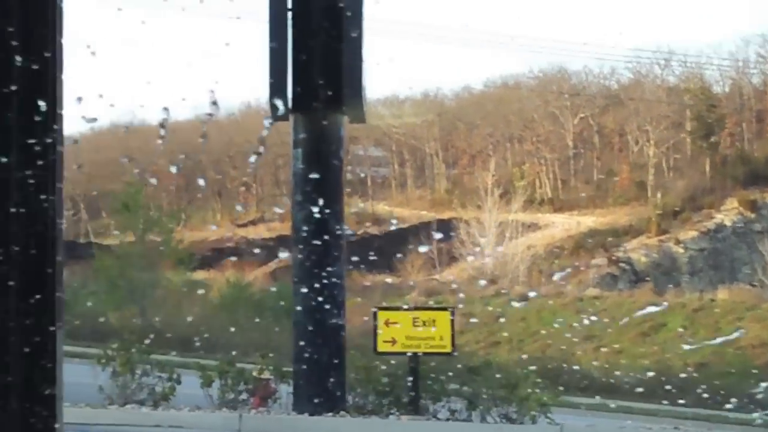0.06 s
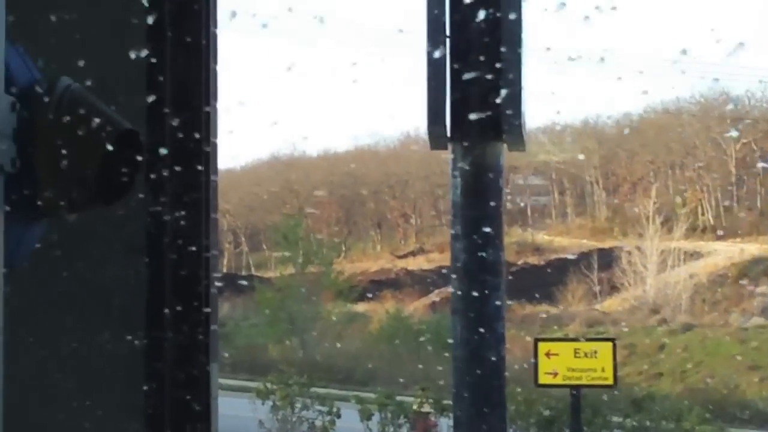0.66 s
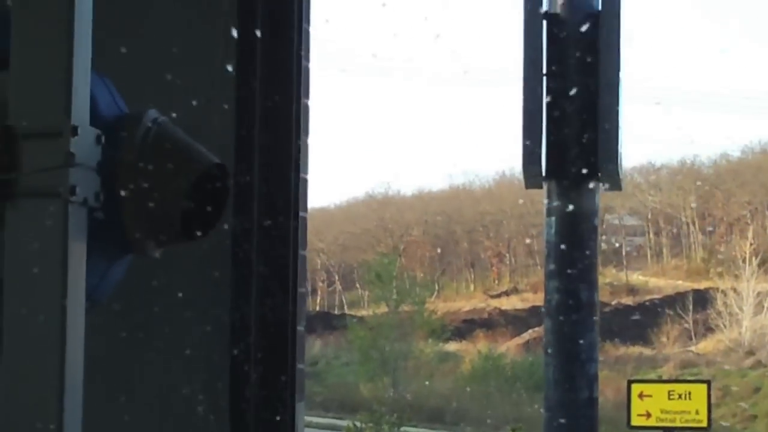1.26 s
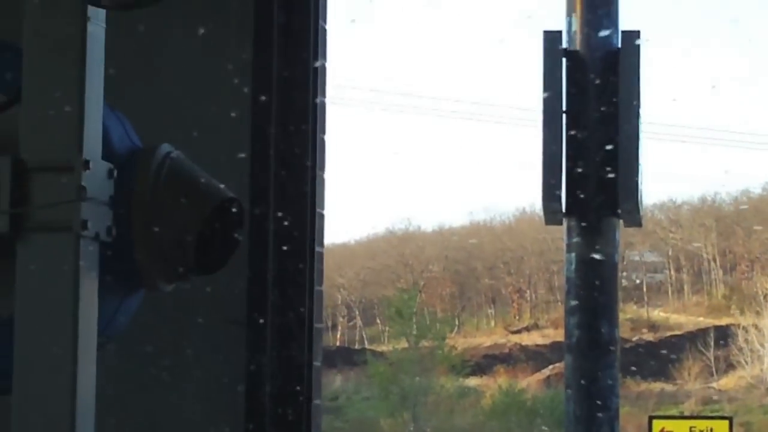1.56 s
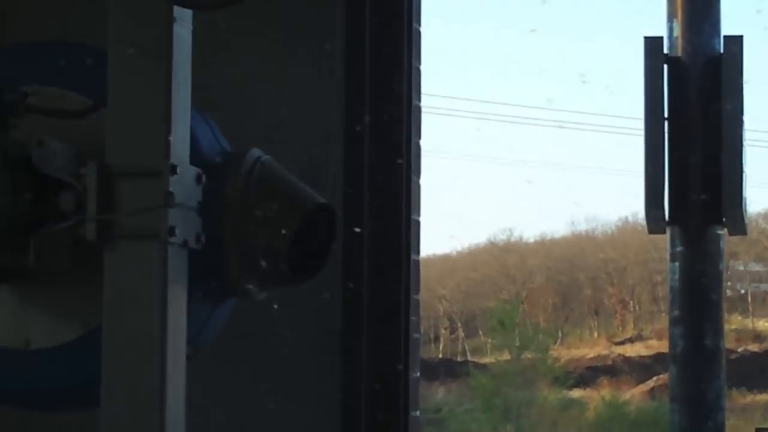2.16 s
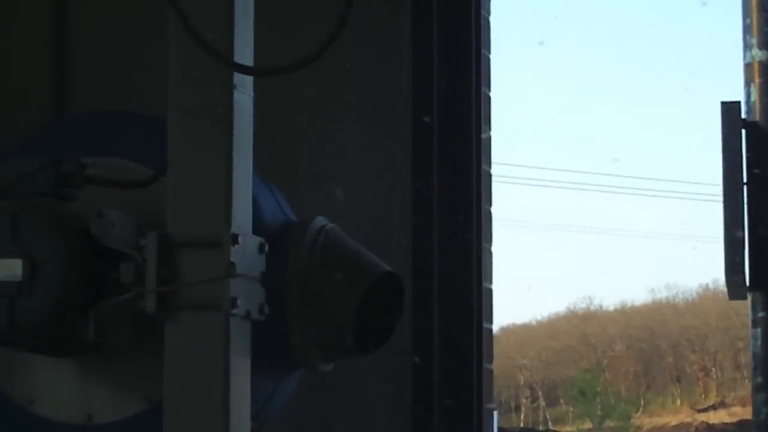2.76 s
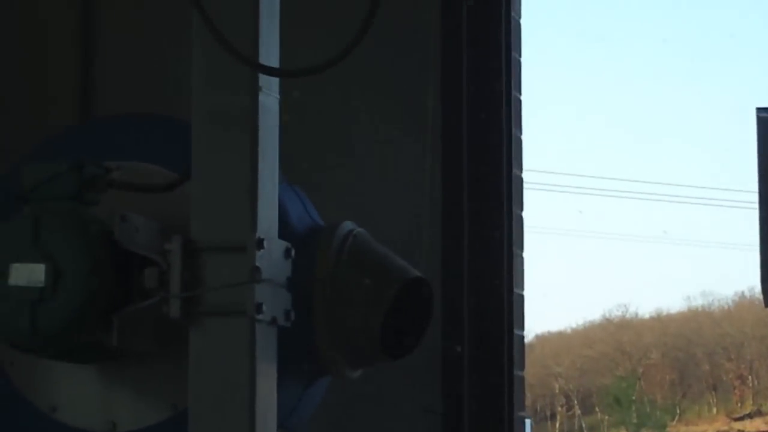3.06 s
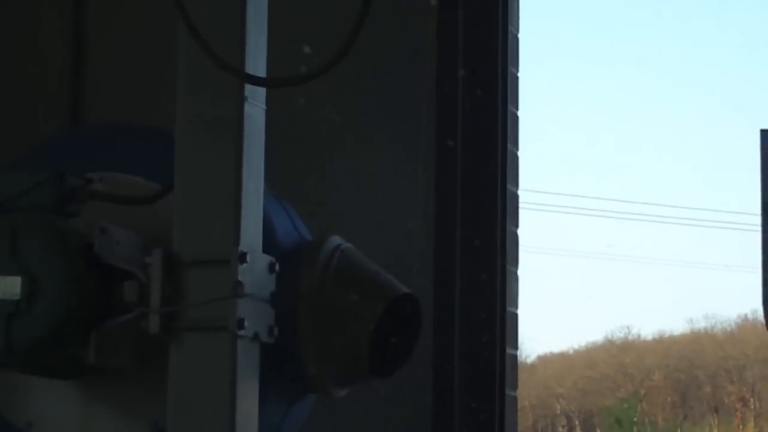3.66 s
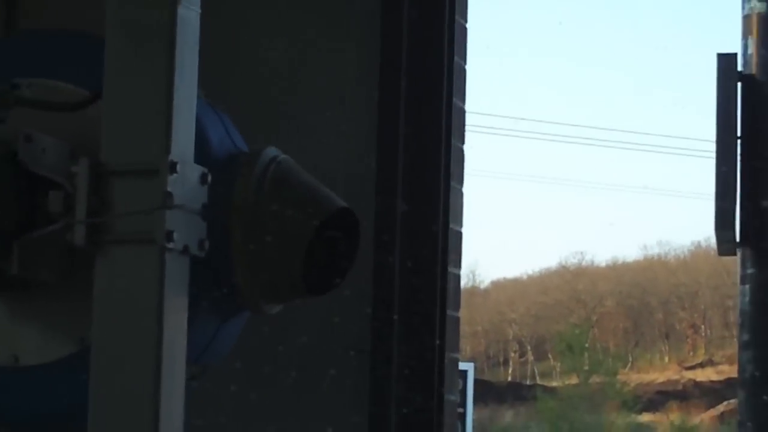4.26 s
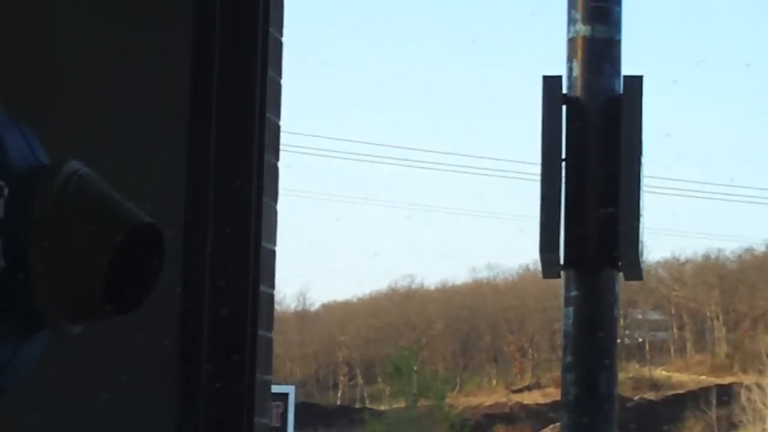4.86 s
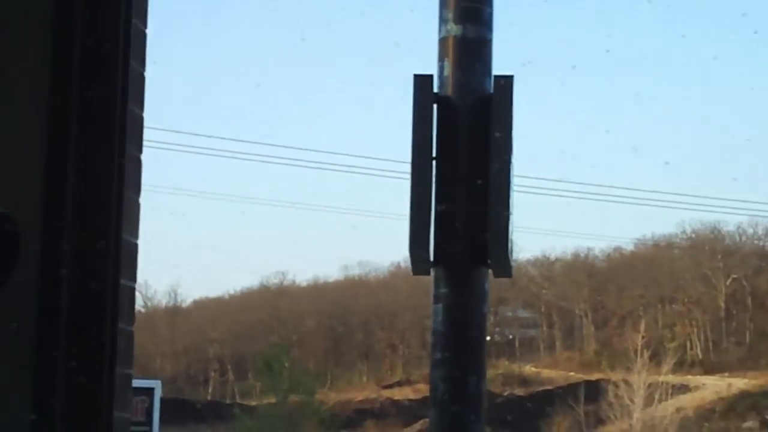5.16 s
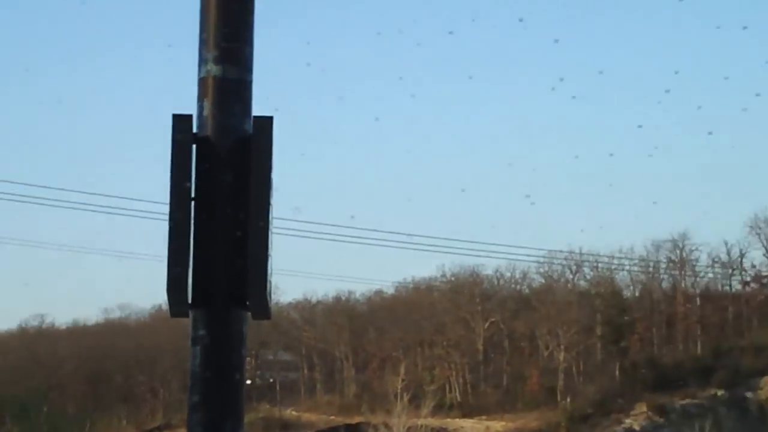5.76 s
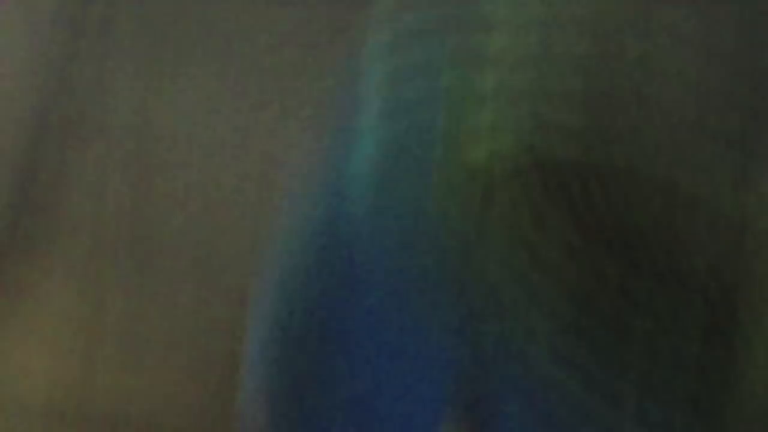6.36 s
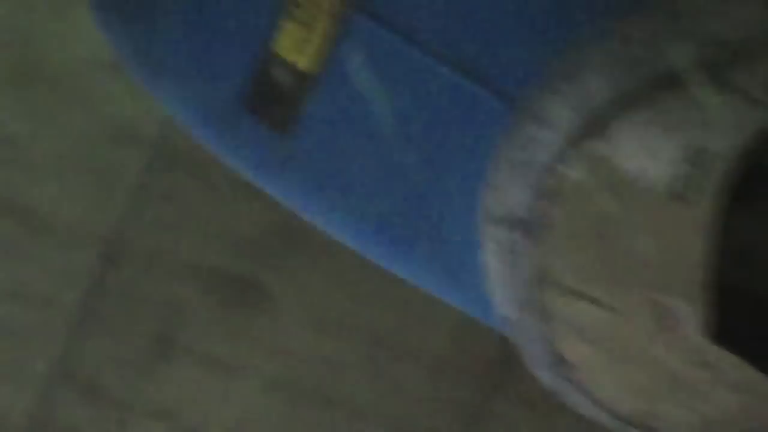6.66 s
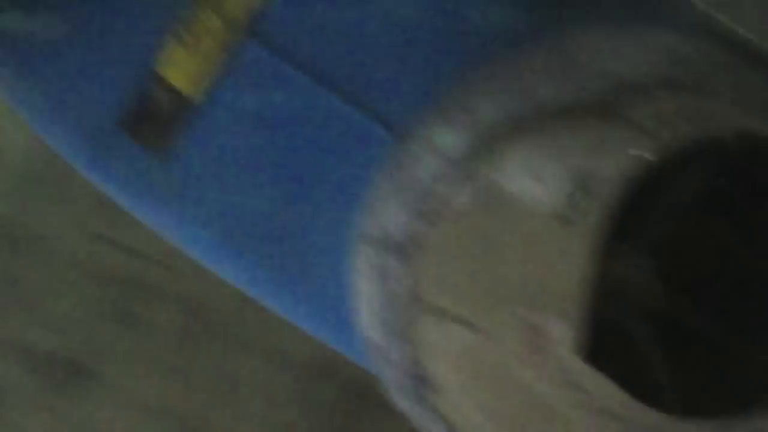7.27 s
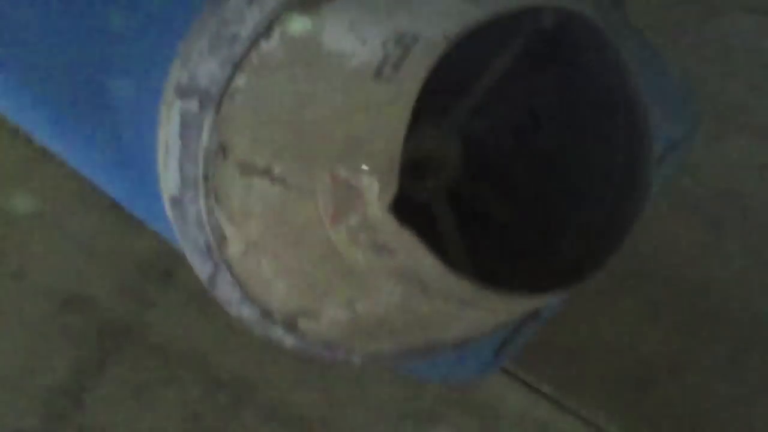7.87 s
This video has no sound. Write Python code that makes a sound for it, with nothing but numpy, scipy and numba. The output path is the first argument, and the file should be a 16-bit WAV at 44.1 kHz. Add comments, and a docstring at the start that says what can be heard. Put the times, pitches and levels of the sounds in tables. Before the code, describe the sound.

Blower dryers blast a car in a wash tunnel, heard from the front seat as a loud, unbroken rush for about eight seconds. From the start, side jets buffet the body in rapid, irregular gusts, with short boxy thumps on the panels and a low, wavering cabin boom. Air hisses over the glass in brief surges, fine bright ticks crackle, and fans hum faintly. From about 3 seconds the roar fills out as a nozzle comes overhead and the fans recede. The thumps hit harder from around 4 seconds. Two flung drops tick faintly on the glass, near 4.3 and 6.6 seconds. The boom is strongest between 5 and 6 seconds, then falls away while the full roar of the roof jet continues to the end. Throughout, the bass overloads the microphone, so the whole rush pumps and flutters.

```python
"""Blower dryers blast a car in a wash tunnel, heard from inside the cabin.
From the start, side jets buffet and slap the body, the cabin booms, air hisses over the glass, fine
ticks crackle and fans hum faintly. From about 3 s the roar fills out as a nozzle comes overhead; the
fans recede, and two flung drops tick on the glass. After 6 s the boom falls away under the roof jet.
All along, the bass overloads the recorder, whose fast limiter makes the whole rush flutter."""
import sys
import numpy as np
from scipy import signal
from scipy.fft import rfft, irfft
from scipy.io import wavfile
from scipy.ndimage import uniform_filter1d
from numba import njit

SR = 44100
rng = np.random.default_rng(int(sys.argv[2]) if len(sys.argv) > 2 else 0)


def unload_audio(sound):
    """Save the sound as a 16-bit wav file, at the path given as the first command line argument."""
    columns = np.transpose(np.atleast_2d(sound))
    # keep every value between -1 and 1, then stretch to whole-number steps
    steps = np.round(np.clip(columns, -1, 1) * 32767)
    wavfile.write(sys.argv[1], SR, steps.astype(np.int16))


N = 348390
TIME = np.arange(N) / SR
BINS = np.fft.rfftfreq(N, 1 / SR)

# Stereo spread of the air noise. Each row: frequency in Hz, side level relative to mid in dB.
STEREO_WIDTH = [(30, -26), (125, -28), (300, -19.5), (500, -15.5), (1300, -10.3), (2900, -14.3),
                (5500, -10), (9000, -5.5), (14000, -3)]
# The car rolls through the jets. Each row: time in seconds, buffeting in dB, cabin boom in dB.
BODY_LEVELS = [(0, -10.5, -15), (1.0, -8.5, -15), (1.35, -9.5, -15.5), (1.8, -7.5, -15.5),
               (3.2, -10.5, -13.5), (5.0, -10, -11.5), (5.9, -10, -10.5), (6.7, -12, -16),
               (7.9, -10.5, -20.5)]
# Rumble of the shaken panels. Each row: frequency in Hz, relative level in dB.
BUFFET_EQ = [(5, -15), (12, -6), (22, -4), (34, 2), (46, -2), (58, -3.5), (78, -10.5), (105, -13),
             (165, -13), (250, -35), (500, -70), (2000, -130)]
# The hardest gusts. Each row: time in seconds, depth of the lull in dB, lift of the slam in dB.
HARD_GUSTS = [(0.041, 4.0, 4.5), (0.145, 2.0, 6.5), (0.192, 4.0, 12.0), (0.267, 2.0, 5.5),
              (0.357, 1.5, 7.5), (0.571, 6.0, 0), (0.605, 3.0, 5.5), (0.681, 2.5, 6.5), (0.736, 6.5, 0),
              (0.769, 6.5, 8.0), (0.906, 4, 2), (0.983, 2.5, 12.0), (1.069, 0.0, 5.5), (1.113, 3.0, 4.5),
              (1.518, 2.0, 6.0), (1.567, 0.0, 8.0), (1.685, 1.0, 11.0), (1.783, 2.0, 8.5),
              (2.024, 4.5, 2.0), (2.088, 4.5, 2.0), (2.294, 5.5, 7.0), (2.363, 4.0, 5.0), (2.435, 3.0, 7.0),
              (2.559, 0.0, 9.5), (2.719, 4.0, 6.5), (2.762, 4.5, 3), (2.797, 0.5, 6.5), (2.854, 2.0, 5.5),
              (2.914, 2.0, 5.5), (3.022, 7.5, 0), (3.197, 5.5, 0), (3.484, 7.0, 5.0), (3.562, 5.0, 2.5),
              (3.735, 5, 4), (3.772, 0.0, 9.0), (3.813, 0.0, 9.5), (3.956, 7.0, 7.0), (4.019, 5.0, 0),
              (4.051, 5.0, 8.0), (4.141, 5.0, 4.5), (4.199, 0.0, 9.5), (4.249, 0.0, 11.0), (4.3, 1.0, 9.0),
              (4.446, 7.0, 0), (4.522, 8.0, 7.0), (4.557, 0.5, 7.0), (4.618, 8.5, 0), (4.673, 0.5, 7.5),
              (4.868, 0.0, 6.5), (4.912, 4.0, 4.5), (4.951, 3.0, 6.5), (5.236, 8.0, 8.0), (5.298, 5.0, 6.5),
              (5.394, 5.5, 5.5), (5.431, 2.0, 6.0), (5.521, 7.0, 7.0), (5.734, 6.0, 4.5), (5.866, 4.0, 2.5),
              (5.913, 0.5, 9.0), (6.0, 2.0, 6.0), (6.157, 2.0, 6.0), (6.211, 2.5, 8.5), (6.265, 4.0, 3.5),
              (6.339, 6.0, 0), (6.401, 2.0, 6.0), (6.526, 4.0, 3.5), (6.583, 1.0, 8.5), (6.63, 0.0, 8.0),
              (6.674, 6.5, 2.5), (7.012, 1.5, 12.0), (7.06, 1.0, 9.5), (7.575, 5.5, 7.0), (7.748, 2.0, 3.0),
              (7.797, 1.0, 9.0), (7.867, 2.5, 5.0)]
# The cabin hum sags as the jets move along the roof. Each row: time in seconds, pitch in Hz.
CABIN_PITCH = [(0, 129), (2, 128.7), (4, 127.1), (5, 123.5), (6.2, 123.7), (7.9, 123)]
# The roof nozzle takes over. Each row: time in seconds, its share of the crossfade from 0 to 1.
ROOF_SHARE = [(0, 0.07), (2.8, 0), (4.2, 0.38), (5.8, 0.33), (6.4, 0.81), (7.3, 0.98)]
# Roar and hiss of the side and roof nozzles. Each row: frequency in Hz, relative level in dB.
SIDE_ROAR_EQ = [(110, -15.5), (170, -2.5), (220, 0), (260, -4), (315, -10.5), (360, -4), (420, -9),
                (460, -7), (515, -9), (580, -16), (760, -16.5), (1000, -30), (1600, -32.5), (8000, -102)]
ROOF_ROAR_EQ = [(145, -4), (174, 6.5), (212, 8), (255, 2), (315, -4.5), (385, -3), (470, -5), (520, -6),
                (580, -13.5), (760, -21.5), (950, -25.5), (1600, -40.5), (8000, -81)]
SIDE_HISS_EQ = [(300, 0), (700, 6.5), (1000, 5.5), (1450, 1.5), (1850, -1), (2400, 0.5), (2900, 2),
                (3450, -0.5), (4200, -6.5), (5600, -12), (7500, -17), (10500, -23.5), (14000, -32),
                (15500, -48)]
ROOF_HISS_EQ = [(300, 2), (700, 5), (1000, 5.5), (1450, 2), (1850, 0), (2800, 0), (3750, 0), (4400, -5.5),
                (5600, -11.5), (7500, -13.5), (10500, -20.5), (14000, -26.5), (15500, -60)]
# A jet sweeps across the windscreen. Each row: centre in seconds, half length in seconds, hiss lift in dB.
JET_SWEEPS = [(0.09, 0.03, 2), (0.557, 0.015, 2), (0.727, 0.02, 4.5), (1.356, 0.14, 2), (1.655, 0.02, 5.5),
              (3.01, 0.02, 2), (3.12, 0.05, 2), (3.53, 0.1, 2.5), (4.45, 0.1, 2.5), (5.22, 0.05, 2.5),
              (6.81, 0.03, 3.5), (6.89, 0.025, 4), (7.25, 0.03, 3), (7.34, 0.035, 4.5), (7.54, 0.028, 3)]
# Jets and spray wander over the glass. Each row: time in seconds, hiss trim in dB.
HISS_RIDE = [(0, 3.5), (0.6, 1.6), (1.4, 1), (1.9, 1.5), (2.4, 2), (3.1, 0.5), (3.6, -0.5), (4.1, 2),
             (4.8, -1), (5.35, 0.5), (6.2, -1), (7.05, -2), (7.6, 0)]
# Fan blade tones. Each row: pitch in Hz, width in Hz, level in dB before the fader ride.
BLADE_TONES = [(521.6, 20, -41.5), (702.4, 11, -44), (1453, 29, -53)]
# Fader ride on the fans. Each row: time in seconds, gain in dB.
FAN_RIDE = [(0, 3), (3, 3.5), (5.5, -7), (7.9, -6)]
# Tone of the draught on the microphone. Each row: frequency in Hz, relative level in dB.
DRAUGHT_EQ = [(10, -10), (30, -2.5), (90, -1), (125, -1.5), (175, -2), (280, -12), (450, -24), (1500, -59)]
# Strength of that draught. Each row: time in seconds, level in dB.
DRAUGHT_RIDE = [(0, -24), (2.2, -24), (3.4, -22), (5.2, -24), (6.6, -23.5), (7.9, -27.5)]
# Slugs of air hit the panels. Each row: time of the peak in seconds, level in dB.
AIR_SLAPS = [(0.076, -20), (0.178, -19), (0.443, -20), (0.492, -20), (0.539, -16), (1.479, -18.5),
             (2.346, -22), (2.746, -22), (3.188, -23.5), (3.472, -21), (3.721, -20), (3.945, -15.5),
             (4.37, -13.5), (4.439, -23), (4.513, -18.5), (4.604, -17.5), (5.148, -13), (5.218, -17),
             (5.386, -22), (5.507, -16.5), (5.724, -17.5), (6.124, -18), (6.319, -16.5), (6.553, -20),
             (6.664, -16.5), (6.883, -15.5), (6.973, -18), (7.048, -16.5), (7.335, -15.5), (7.483, -16),
             (7.738, -22)]
# Boxy tone of a slap. Each row: frequency in Hz, relative level in dB.
SLAP_EQ = [(120, -14), (230, 8), (400, 5.5), (560, 0), (800, -10), (1200, -18), (1900, -23), (3200, -23),
           (5000, -34), (14000, -54)]
# Drops flung on the glass. Each row: start in seconds, relative level in dB.
FLUNG_DROPS = [(4.328, -33), (6.578, -28)]


def gain_of(db):
    """Decibels to amplitude."""
    return 10 ** (np.asarray(db) / 20)


def unit_rms(x):
    """Scales to rms 1."""
    return x / np.sqrt(np.mean(x ** 2) + 1e-20)


def spectrum(points):
    """An EQ curve: gain at every frequency from (Hz, dB) points on a log axis."""
    hz, db = np.transpose(points)
    return gain_of(np.interp(np.log(BINS + 1), np.log(hz + 1), db))


def curves(rows):
    """Automation lanes: each value column of (seconds, value, ..) rows at every sample."""
    times, *columns = np.transpose(rows)
    return np.array([np.interp(TIME, times, column) for column in columns])


def resonance(hz, width_hz):
    """Gain of a resonance with steep skirts."""
    return 1 / (1 + ((BINS - hz) / width_hz * 2) ** 2)


def turbulence(colour):
    """Stereo noise of a given colour, nearly mono in the bass and wide in the treble."""
    mid, side = rfft(rng.standard_normal((2, N))) * colour
    side = side * spectrum(STEREO_WIDTH)
    return unit_rms(irfft(np.array([mid + side, mid - side]), N))


def eddies(rate_hz):
    """A random swell of rms 1 that moves up to about the given rate."""
    return unit_rms(irfft(rfft(rng.standard_normal(N)) / (1 + (BINS / rate_hz) ** 4), N))


def steadied(x, size=4500):
    """Evens out swells longer than size samples, as a constant air supply does; quick flutter stays."""
    power = (abs(signal.hilbert(x)) ** 2).mean(0) / 2
    return x / np.sqrt(uniform_filter1d(uniform_filter1d(power, size), size // 2) + 1e-12)


def wavering(hz, width_hz):
    """A narrow band of noise whose centre follows a pitch curve."""
    ring = signal.hilbert(turbulence(resonance(hz.mean(), width_hz)))
    return (ring * np.exp(2j * np.pi * np.cumsum(hz - hz.mean()) / SR)).real


def cabin_hum(waver_hz=5, flicker_db=1.6, rate_hz=6):
    """Turbulence rings in the cabin air: a low hum, unsteady in pitch and level."""
    flicker = gain_of(flicker_db * eddies(rate_hz))
    pitch = curves(CABIN_PITCH)[0] + waver_hz * eddies(rate_hz)
    return flicker * steadied(wavering(pitch, width_hz=22))


def lesser_gusts(count=140, per_s=19, most_db=3.5, clear_s=.035):
    """Small gusts fall at uneven gaps between the hard ones; returns rows like HARD_GUSTS."""
    gap, lull, slam = rng.random((count, 3)).T
    times = np.cumsum(.5 + gap) / per_s
    clear = abs(times[:, None] - np.array(HARD_GUSTS)[:, 0]).min(1) > clear_s
    return list(np.transpose([times, most_db * lull, most_db * slam])[clear])


def gusting(lull_lead_s=.012, lull_half_s=.012, slam_lag_s=.005, slam_half_s=.008):
    """Gain of the gusts: the air stream lifts off the body for a moment, then slams back."""
    db = np.zeros(N)
    for at_s, lull_db, slam_db in list(HARD_GUSTS) + lesser_gusts():
        near = slice(*np.searchsorted(TIME, [at_s - .06, at_s + .04]))
        t = TIME[near] - at_s
        db[near] -= lull_db * np.exp(-((t + lull_lead_s) / lull_half_s) ** 2)
        db[near] += slam_db * np.exp(-((t - slam_lag_s) / slam_half_s) ** 2)
    return gain_of(db)


def body_buffeting():
    """The low end: gusts shake the panels, and the cabin answers with a boom."""
    buffet_level, boom_level = gain_of(curves(BODY_LEVELS))
    buffet = buffet_level * steadied(turbulence(spectrum(BUFFET_EQ)))
    boom = boom_level * cabin_hum()
    return gusting() * np.hypot(buffet_level, boom_level) * steadied(buffet + boom, size=1100)


def nozzles(side_eq, roof_eq, overhead):
    """Jet noise crossfades at equal power from the side nozzles to the one overhead."""
    side = np.sqrt(1 - overhead) * turbulence(spectrum(side_eq))
    roof = np.sqrt(overhead) * turbulence(spectrum(roof_eq))
    return side + roof


def jets(eddy_db=.5, flutter_db=1.35):
    """The jets roar on roof and windscreen, swelling with each eddy, and hiss as they shear over glass."""
    overhead = np.clip(curves(ROOF_SHARE)[0], 0, 1)
    sweep_db = sum(db * np.exp(-((TIME - at_s) / half_s) ** 2) for at_s, half_s, db in JET_SWEEPS)
    # The roof nozzle brings 7.5 dB more roar and 1 dB less hiss.
    roar_db = -23 + 7.5 * overhead + .58 * sweep_db + eddy_db * eddies(rate_hz=35)
    hiss_db = -33.5 - overhead + sweep_db + curves(HISS_RIDE)[0] + flutter_db * eddies(rate_hz=40)
    roar = gain_of(roar_db) * nozzles(SIDE_ROAR_EQ, ROOF_ROAR_EQ, overhead)
    hiss = gain_of(hiss_db) * nozzles(SIDE_HISS_EQ, ROOF_HISS_EQ, overhead)
    return roar + hiss


def fans(waver=.00905, rate_hz=3, flicker_db=2):
    """Several fans at nearly one speed give fuzzy blade tones that waver in pitch and strength."""
    speed = 1 + waver * eddies(rate_hz)
    tones = sum(gain_of(db + flicker_db * eddies(rate_hz)) * wavering(hz * speed, width_hz)
                for hz, width_hz, db in BLADE_TONES)
    return gain_of(curves(FAN_RIDE)) * tones


def draught():
    """Moving air rumbles on each microphone port separately."""
    rumble = irfft(rfft(rng.standard_normal((2, N))) * spectrum(DRAUGHT_EQ), N)
    return gain_of(curves(DRAUGHT_RIDE)) * steadied(rumble)


def fine_ticks(count=600, low_hz=2500, high_hz=13000, half_cycles=1.8, tilt_db=-7, spread_db=7):
    """Fine, bright ticks crackle at random over the hiss: a few cycles each, the higher the fainter."""
    out = np.zeros((2, N))
    t = np.arange(-128, 128) / SR
    for when, pitch, force, pan in rng.random((count, 4)):
        hz = low_hz * (high_hz / low_hz) ** pitch
        level = gain_of(-33 + tilt_db * pitch + spread_db * force ** 2)
        tick = level * np.exp(-(t * hz / half_cycles) ** 2) * np.sin(2 * np.pi * hz * t)
        start = int(when * (N - len(t)))
        out[:, start:start + len(t)] += np.sqrt([[pan], [1 - pan]]) * tick
    return out


def slaps(attack_s=.011, release_s=.009):
    """Each slug of air thumps on the panels: a quick swell, cut off short."""
    envelope = np.zeros(N)
    for peak_s, db in AIR_SLAPS:
        slope_s = np.where(TIME < peak_s, attack_s, release_s)
        envelope += gain_of(db) * np.exp(-((TIME - peak_s) / slope_s) ** 2)
    return envelope * turbulence(spectrum(SLAP_EQ))


def drops(decay_s=.0016):
    """Each flung drop lands as a thin, bright tick on the glass."""
    strikes = sum(gain_of(db) * (TIME >= start_s) * np.exp(-abs(TIME - start_s) / decay_s)
                  for start_s, db in FLUNG_DROPS)
    return strikes * turbulence(resonance(hz=12000, width_hz=8000)) / 2


def scene():
    """The mix at the front seat."""
    return body_buffeting() + jets() + fans() + draught() + fine_ticks() + slaps() + drops()


@njit
def limiter_gain(peaks, threshold=.72, duck_db_per_s=2400, recover_db_per_s=520, lag_s=.0012):
    """Gain in dB: dives while the output is too hot, else keeps rising; the amplifier lags behind."""
    out = np.empty(len(peaks))
    target_db = db = 0.
    for i in range(len(peaks)):
        too_hot = peaks[i] * 10 ** (db / 20) > threshold
        target_db += (-duck_db_per_s if too_hot else recover_db_per_s) / SR
        db += (target_db - db) / (lag_s * SR)
        out[i] = db
    return out


def limit(dry, split_hz=1300, treble_share=.87):
    """The limiter pumps the bass on every swing, and the treble more gently and smoothly."""
    gain_db = limiter_gain(abs(dry).max(0))
    bass = irfft(rfft(dry) / (1 + (BINS / split_hz) ** 2), N)
    treble_db = treble_share * uniform_filter1d(gain_db, size=190)
    return bass * gain_of(gain_db) + (dry - bass) * gain_of(treble_db)


def record(dry, ceiling=.95, steady_fizz_db=-53, cutoff_hz=15300):
    """The limiter lifts the rush in each lull and ducks it on each bass swing; what slips past clips."""
    limited = limit(dry)
    clipped = ceiling * limited / (1 + (limited / ceiling) ** 24) ** (1 / 24)
    # A faint, wide, steady fizz that is not ducked.
    noisy = clipped + gain_of(steady_fizz_db) * rng.standard_normal(dry.shape)
    fade = signal.windows.tukey(N, .001)
    low_pass = signal.firwin(191, cutoff_hz, window=("kaiser", 9), fs=SR)
    return signal.oaconvolve(fade * noisy, low_pass[None], "same")


dry = scene()
out = record(dry)
unload_audio(out)
```